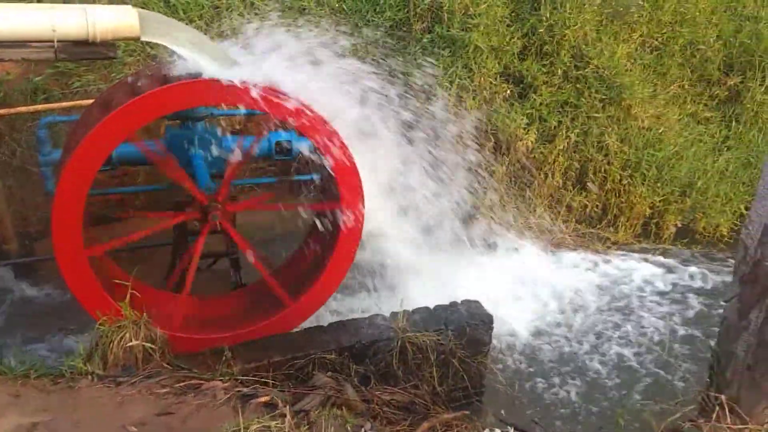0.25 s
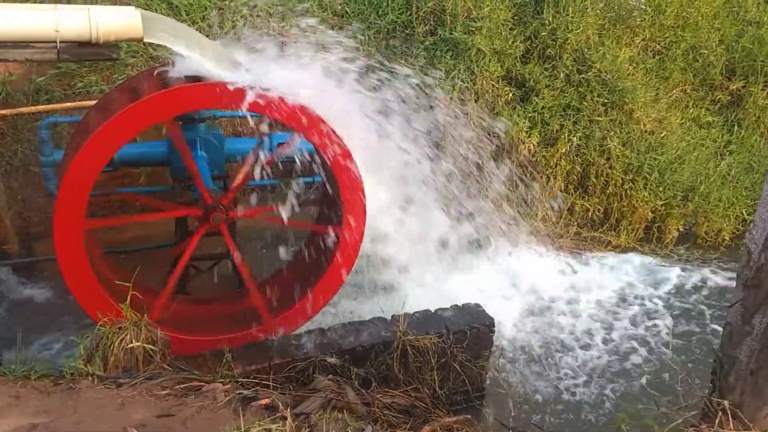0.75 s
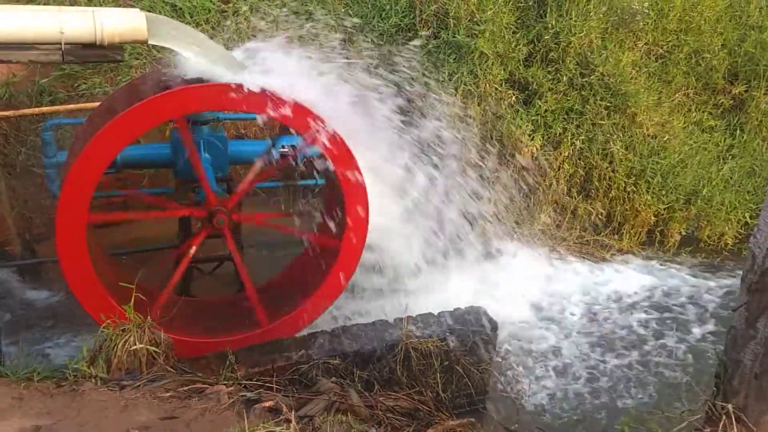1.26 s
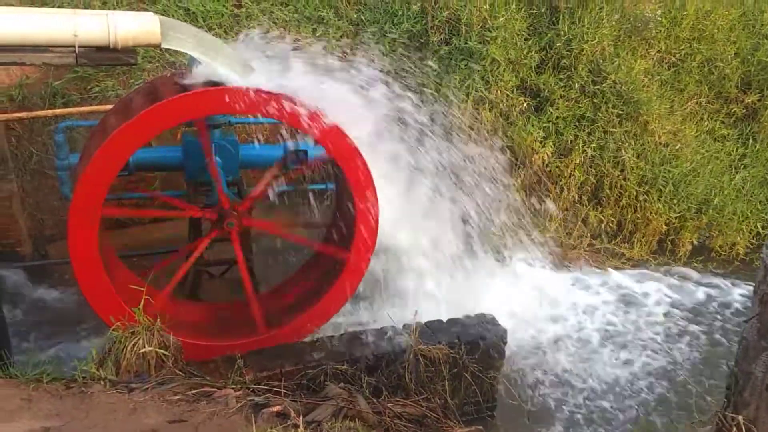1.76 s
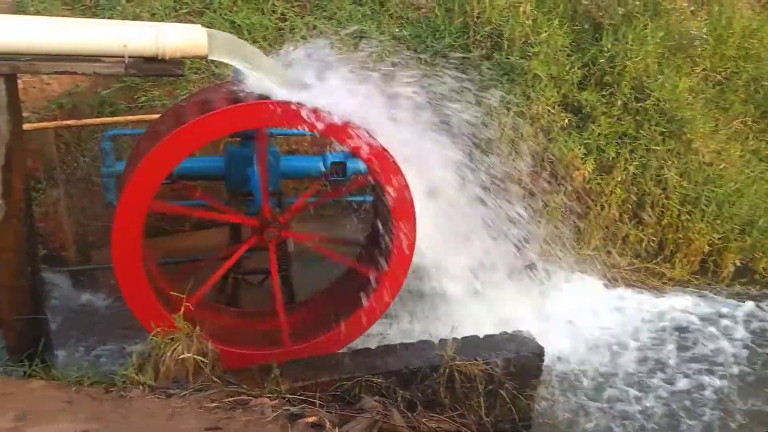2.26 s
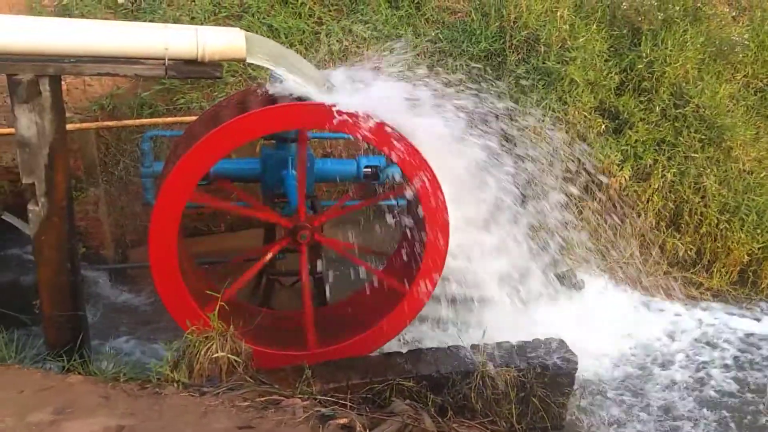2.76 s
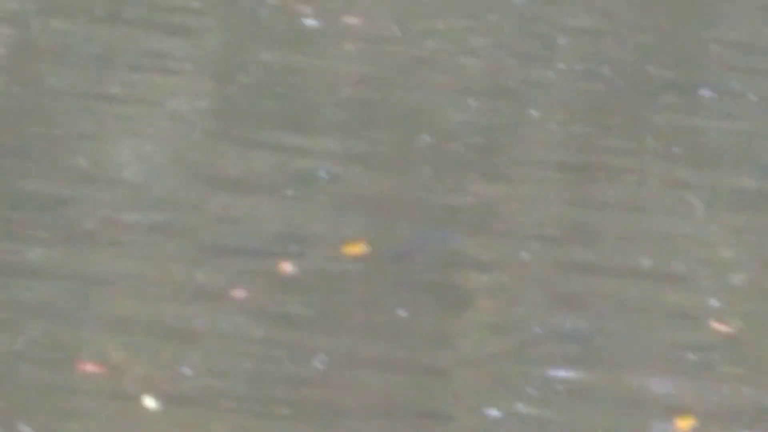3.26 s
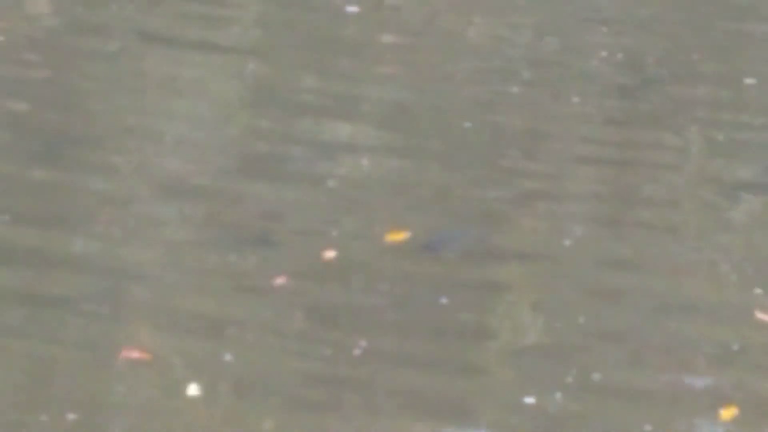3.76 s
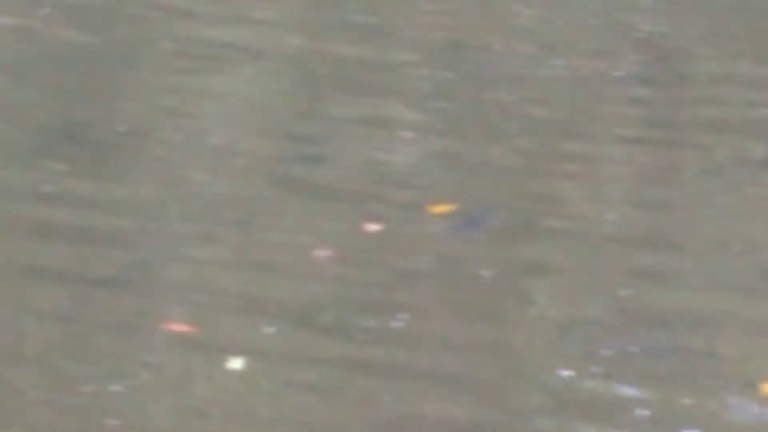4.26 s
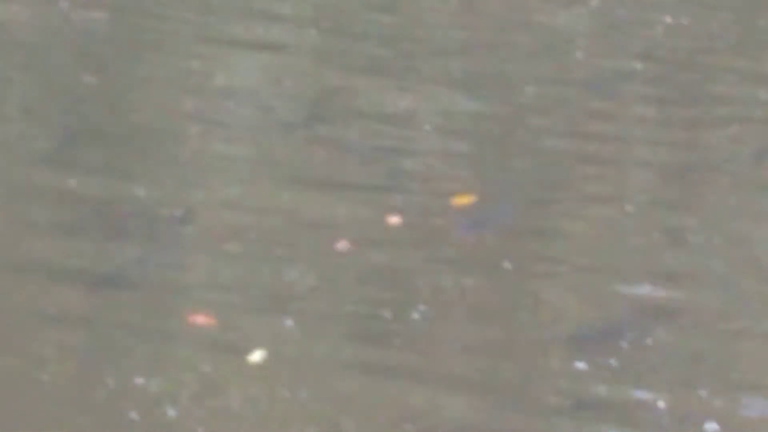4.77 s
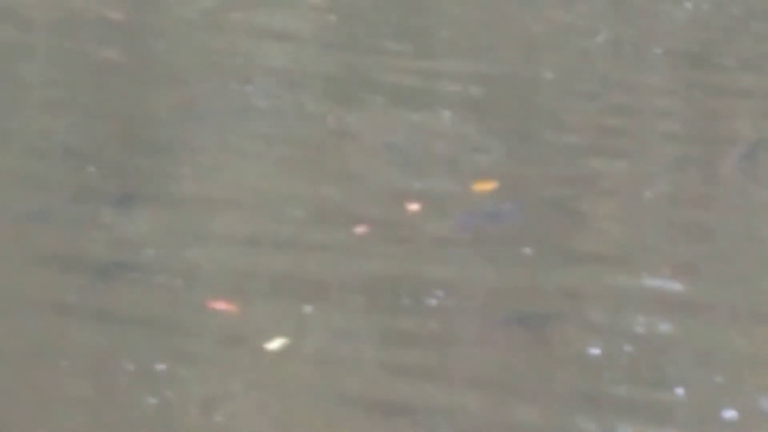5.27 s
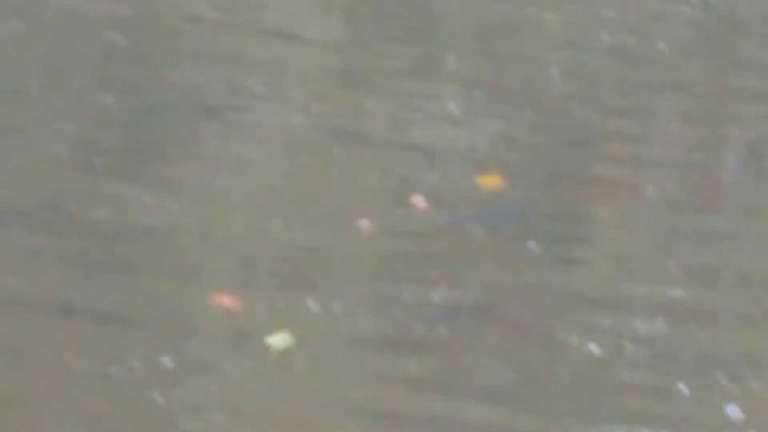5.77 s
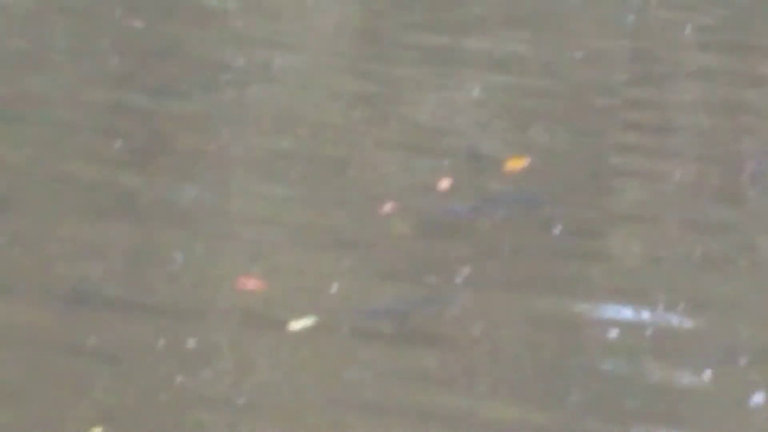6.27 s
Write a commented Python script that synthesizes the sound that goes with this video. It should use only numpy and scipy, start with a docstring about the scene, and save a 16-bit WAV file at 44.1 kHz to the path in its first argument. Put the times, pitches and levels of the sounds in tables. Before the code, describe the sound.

From 0 to about 3.17 seconds, a hand-held stereo camera stands close to a small water wheel outdoors. Water from a pipe strikes it and falls into a channel in a loud continuous rush: low, lumpy churning in the centre, beneath wide bright spray made of patchy hiss, dense tiny drops and short bubble tones. The level wavers only slightly. Single drops smack near the right port, one at 0.3, softer plops at 0.85 and 1.04, the strongest at 1.1 and 1.23, others at 1.3 to 1.75, a pair at 2.18, and thin, sharp ticks around 2.65 to 2.9, each trailing a ragged little splash. At 3.17 the rush cuts off into silence. At 3.45 it returns abruptly, far fainter and duller, a smooth steady wash from across a pond, without single drops, holding to the end near 6.6 seconds.

```python
"""Close by, a pipe pours onto a small steel water wheel and the thrown water plunges into a race:
a lumpy low noise under a spray of patchy hiss, short drop tones and bubble tones, with single drops
smacking near the right port. Then the hand-held camera, with its two microphone ports, is off for a moment.
Last comes the same fall from across a pond, fainter and duller, with no single drops."""
import sys
import numpy as np
from scipy import signal
from scipy.fft import rfft, irfft, next_fast_len
from scipy.io import wavfile
from scipy.ndimage import uniform_filter1d, map_coordinates

SR = 44100
rng = np.random.default_rng(int(sys.argv[2]) if len(sys.argv) > 2 else 0)


def master_out(mix):
    """Clip the mix to full scale and print it as 16-bit PCM to the path in sys.argv[1]."""
    frames = np.transpose(np.atleast_2d(mix))
    ceiling = np.clip(frames, -1, 1)
    pcm = np.round(ceiling * 32767).astype(np.int16)
    wavfile.write(sys.argv[1], SR, pcm)


N = 287532

STOP_S, RESUME_S = 3.1657, 3.4452  # the camera is off between these times
TOP_HZ = 15750  # upper band limit of the camera
NEAR_PLUNGE_DB, NEAR_SPRAY_DB = -30, -24  # rms levels beside the wheel
FAR_PLUNGE_DB, FAR_SPRAY_DB = -42, -42  # rms levels across the pond
# droplets after a near drop: mean wait beyond the first ms [s], least level re the drop before
# the fade [dB], fade [dB per ms]
SPLASH_S, SPLASH_DB, SPLASH_FADE_DB = .007, -20, .8

# colour of the low plunge, alike at both ports: (frequency [Hz], relative level [dB])
NEAR_PLUNGE_COLOUR = [(25, -36), (33, -30.5), (51, -16.5), (99, -1.5), (157, -2), (187, -4), (219, 0),
                      (290, -3), (350, -7), (403, -2), (433, -5.5), (470, -2.5), (520, -12), (640, -35)]
FAR_PLUNGE_COLOUR = [(25, -31), (33, -21), (52, -6), (65, 0.5), (139, -4.5), (183, -3), (217, -2.5),
                     (272, -7), (319, -10), (429, -16.5), (520, -12), (640, -31), (900, -70)]
# colour of the spray at each port, the left one shaded by the camera body:
# (frequency [Hz], relative level [dB])
NEAR_LEFT_COLOUR = [(420, -30), (520, -13.5), (570, -4.5), (684, -3.5), (951, -3), (1310, -7), (1570, -8),
                    (1860, -11), (2160, -9.5), (2590, -13), (2970, -10.5), (3410, -11.5), (7750, -16.5),
                    (15700, -13)]
NEAR_RIGHT_COLOUR = [(420, -31.5), (520, -4), (766, -3.5), (1220, 0), (1760, -2.5), (2160, -0.1),
                     (2510, -3), (3780, -3.5), (8110, -15), (9080, -15.5), (11200, -8), (12500, -8.5),
                     (14300, -11), (15700, -7)]
FAR_LEFT_COLOUR = [(420, -37), (520, -6), (653, -1), (802, -4), (909, -11), (1170, -4), (1470, -13.5),
                   (1910, -6), (2370, -14.5), (3010, -14), (4850, -16.5), (6900, -20.5), (8600, -22.5),
                   (11000, -21), (15700, -22.5)]
FAR_RIGHT_COLOUR = [(420, -38), (520, -3.5), (661, -1.5), (941, -5.5), (1050, -4), (1470, -2.5), (1700, -4),
                    (1930, -1), (2390, -6.5), (3650, -13), (6830, -16.5), (9600, -23), (11700, -19.5),
                    (13800, -16), (14700, -18), (15700, -23)]
# likeness of the sound at the two ports: (frequency [Hz], coherence [0-1])
NEAR_COHERENCE = [(60, .995), (130, .996), (250, .99), (450, .95), (560, .82), (690, .89), (780, .82),
                  (953, .86), (1200, .73), (1660, .25), (1960, .34), (2780, .1), (9000, .1)]
FAR_COHERENCE = [(60, .995), (300, .96), (430, .74), (560, .87), (680, .84), (953, .14), (1150, .38),
                 (1380, .08), (2030, .61), (2390, .32), (2980, .47), (9000, .1)]
# phase by which the right port leads the left: (frequency [Hz], lead [rad])
NEAR_PHASE_LEAD = [(100, 0), (480, .4), (700, .3), (1100, 1.2), (1600, .3), (2400, -.5), (4000, -2.2)]
FAR_PHASE_LEAD = [(60, 0), (500, -.3), (1000, 0), (2000, -1.1), (3300, -3.1), (5300, -9.4), (8000, -14.1),
                  (16000, -26.1)]
# how thickly drops spatter beside the wheel, against the hiss: (time [s], level [dB])
NEAR_SPATTER = [(0, -7.5), (.4, -11), (.6, -11.5), (.9, -10.5), (1.1, -8), (1.4, -10.5), (2.2, -9),
                (2.5, -11.5), (2.9, -10.5), (3.2, -12.5)]
# single drops by the right port, short smacks and longer plops:
# (time [s], peak level [dB], starting pitch [Hz], time to the peak [cycles])
NEAR_DROPS = [(0.3125, -12, 3800, .5), (.854, -20, 1130, 3), (1.0352, -18, 1500, 2.5),
              (1.1079, -5.5, 3950, .75), (1.1095, -17, 1200, .5), (1.1212, -14, 2000, .8),
              (1.1305, -20, 5000, 1.2), (1.2288, -2.5, 2950, .42), (1.26, -16, 3200, 1.7),
              (1.3216, -10, 4300, .45), (1.449, -15, 5200, .8), (1.5277, -13, 2800, .7),
              (1.7515, -16, 4200, .7), (2.1825, -12, 1660, .6), (2.1908, -11, 3530, .6),
              (2.6582, -12, 3980, .6), (2.8092, -13, 4180, .6), (2.8245, -12, 12000, .5),
              (2.8998, -9.5, 12200, .5)]


def amp(db):
    """Gain of a level in dB."""
    return 10 ** (np.asarray(db) / 20)


def unit(x):
    """x at rms 1."""
    return x / np.sqrt(np.mean(x ** 2) + 1e-20)


def along(points, hz):
    """Value at hz, read between (Hz, value) points on a log frequency axis."""
    f, v = np.transpose(points)
    return np.interp(np.log(hz + 1), np.log(f + 1), v)


def wobble(rate):
    """A smooth random curve with rate knots a second."""
    knots = rng.standard_normal(int(N * rate / SR) + 4)
    return map_coordinates(knots, [np.arange(N) * rate / SR])


def filtered(x, response):
    """x shaped by a complex response, a function of frequency."""
    m = next_fast_len(N + 8192)
    spectrum = rfft(x, m) * response(np.fft.rfftfreq(m, 1 / SR))
    return irfft(spectrum, m)[..., :N]


def ports(pair, left, right, coherence, lead):
    """Two unrelated sources mixed to the likeness, colour and phase lead at the two ports; rms 1."""
    def share(hz):
        # angle that splits the pair into a common and an opposed part
        angle = np.arccos(np.clip(along(coherence, hz), 0, 1)) / 2
        return np.array([np.cos(angle), np.sin(angle)])

    def colour(hz):
        gain = amp([along(left, hz), along(right, hz)])
        return gain * np.exp(np.outer([-.5j, .5j], along(lead, hz)))

    mid, side = filtered(pair, share)
    return unit(filtered(np.array([mid + side, mid - side]), colour))


def grains(start_s, db, hz, cycles, rise, size):
    """Short tones that swell, die within a few cycles and climb in pitch as a bubble nears the surface."""
    k = np.arange(size)
    turns = hz[:, None] * k / SR
    age = turns / cycles  # 1 at the peak
    swell = amp(db)[:, None] * age * np.exp(1 - age)
    tone = swell * np.sin(2 * np.pi * turns * (1 + rise * age / 2))
    at = np.round(start_s * SR).astype(int)[:, None] + k
    return np.bincount(at.ravel(), tone.ravel(), N + size)[:N]


def plunge(colour, coherence, lead, unsteadiness):
    """Water plunging into the race: low noise, made lumpy by a random wobble of its level."""
    lumps = unsteadiness * amp(1.1 * wobble(24))
    return ports(lumps * rng.standard_normal((2, N)), colour, colour, coherence, lead)


def patchy_hiss(patchy_db):
    """Two unrelated noises that share patches of random gain, where sheets of water break up."""
    z = signal.stft(rng.standard_normal((2, N)), nperseg=256)[2]
    field = rng.standard_normal(z.shape[1:])
    field = uniform_filter1d(field, 5, 0)  # over frequency bins
    field = uniform_filter1d(field, 8, 1)  # over time frames
    return signal.istft(z * amp(patchy_db * unit(field)), nperseg=256)[1][:, :N]


def shower(count, size, centre_hz, octaves, cycles):
    """Two unrelated showers of grains of scattered pitch and size; low ones last longer and start weaker."""
    when = rng.random((2, count)) * (N - 1) / SR
    pitch, bulk = rng.standard_normal((2, count)), rng.standard_normal((2, count))
    hz = np.clip(centre_hz * 2 ** (octaves * pitch), 600, SR / 3)
    size_db = 5 * np.clip(bulk, -3, 2.6) - 10 * np.log10(centre_hz / hz)
    pair = [grains(s, db, f, cycles, rise=.06, size=size) for s, db, f in zip(when, size_db, hz)]
    return unit(np.array(pair))


def spray(left, right, coherence, lead, unsteadiness, patchy_db, drops_db, bubbles_db):
    """Thrown water: patchy hiss with dense short drops and longer, lower bubbles, flickering together."""
    drops = shower(count=14000, size=220, centre_hz=4220, octaves=1.094, cycles=.74)
    bubbles = shower(count=1600, size=900, centre_hz=1400, octaves=.7, cycles=4)
    grainy = patchy_hiss(patchy_db) + amp(drops_db) * drops + amp(bubbles_db) * bubbles
    flicker = unsteadiness * amp(.5 * wobble(35))
    return ports(flicker * grainy, left, right, coherence, lead)


def near_drops():
    """Each near drop pops for a few cycles, then a ragged splash of droplets; faint at the shaded port."""
    s, db, hz, cycles = np.transpose(NEAR_DROPS)
    pops = grains(s, db, hz, cycles[:, None], rise=.07, size=900)
    # eight droplets a drop, with exponential waits
    late, pitch, bulk = np.moveaxis(rng.random((len(s), 8, 3)), 2, 0)
    delay = .001 - SPLASH_S * np.log(1 - late)
    splash_s = s[:, None] + delay
    splash_db = db[:, None] + SPLASH_DB + 8 * bulk - SPLASH_FADE_DB * delay * 1000
    splash_hz = np.minimum(hz[:, None] * 2 ** (1.6 * pitch - .8), SR / 3)
    splash = grains(splash_s.ravel(), splash_db.ravel(), splash_hz.ravel(), .6, rise=.07, size=900)
    return (pops + splash) * amp([[-12], [0]])  # left, right


def fall(plunge_db, spray_db, plunge_colour, left, right, coherence, lead,
         unsteady_db, patchy_db, drops_db, bubbles_db):
    """Low plunge and spray share one slight unsteadiness of level, almost none from across the pond."""
    unsteadiness = amp(unsteady_db * wobble(12))
    low = plunge(plunge_colour, coherence, lead, unsteadiness)
    high = spray(left, right, coherence, lead, unsteadiness, patchy_db, drops_db, bubbles_db)
    return amp(plunge_db) * low + amp(spray_db) * high


def scene():
    """The wheel close by, a silence, the wheel across the pond."""
    t = np.arange(N) / SR
    near = fall(NEAR_PLUNGE_DB, NEAR_SPRAY_DB, NEAR_PLUNGE_COLOUR, NEAR_LEFT_COLOUR, NEAR_RIGHT_COLOUR,
                NEAR_COHERENCE, NEAR_PHASE_LEAD, unsteady_db=.27, patchy_db=1.06,
                drops_db=np.interp(t, *np.transpose(NEAR_SPATTER)), bubbles_db=-17)
    far = fall(FAR_PLUNGE_DB, FAR_SPRAY_DB, FAR_PLUNGE_COLOUR, FAR_LEFT_COLOUR, FAR_RIGHT_COLOUR,
               FAR_COHERENCE, FAR_PHASE_LEAD, unsteady_db=-.02, patchy_db=.57,
               drops_db=-14, bubbles_db=-17)
    # at the stop the sound drops 13 dB at once, and a faint rest fades within 30 ms
    fade = np.where(t < STOP_S, 1, amp(-13 - 1800 * np.abs(t - STOP_S)))
    return near * fade + far * (t > RESUME_S) + near_drops()


def record(dry):
    """The camera keeps nothing above its band limit: a very steep low-pass."""
    return filtered(dry, lambda hz: 1 / (1 + (hz / TOP_HZ) ** 1200))


dry = scene()
out = record(dry)
master_out(out)
```